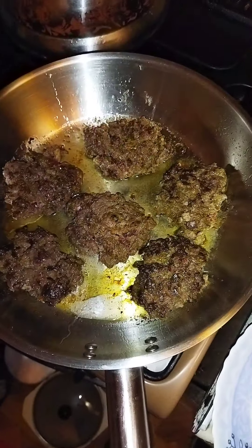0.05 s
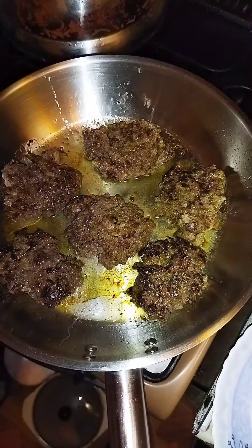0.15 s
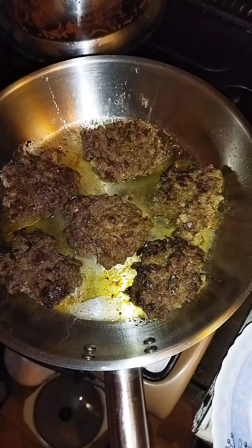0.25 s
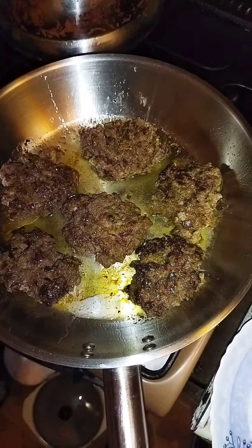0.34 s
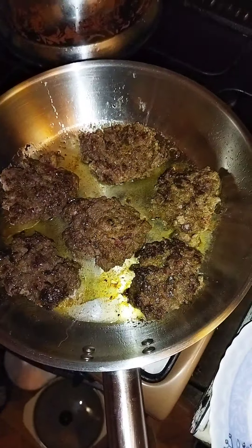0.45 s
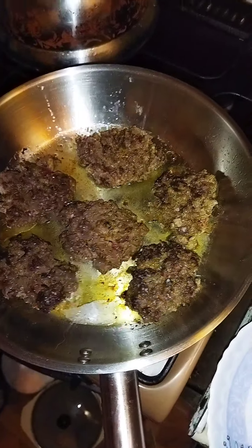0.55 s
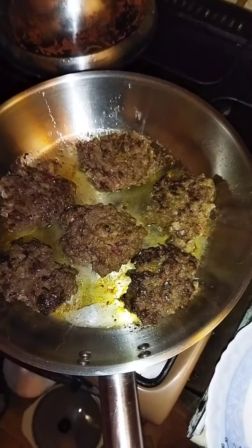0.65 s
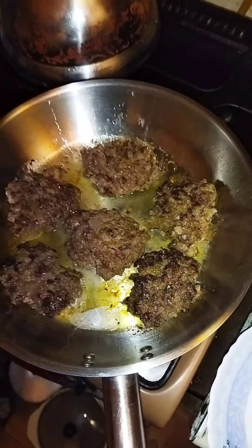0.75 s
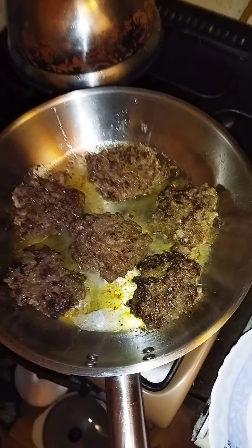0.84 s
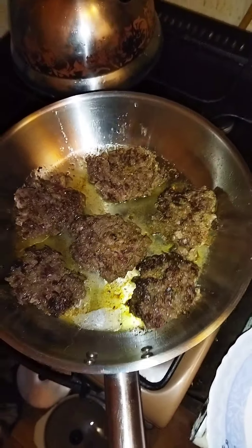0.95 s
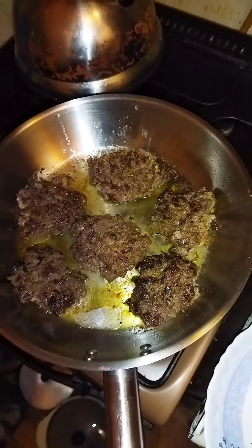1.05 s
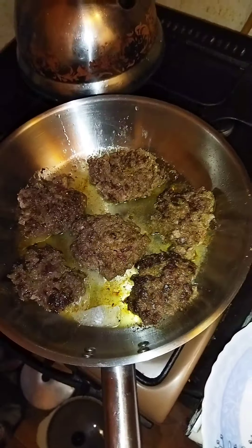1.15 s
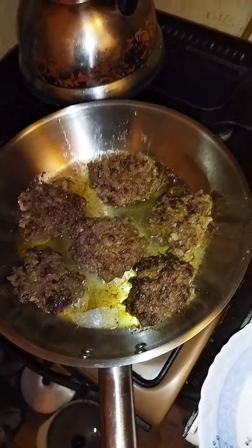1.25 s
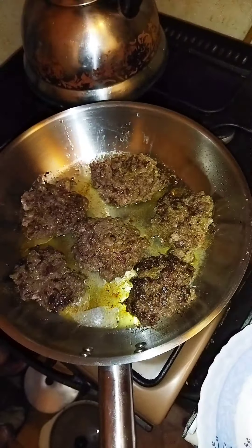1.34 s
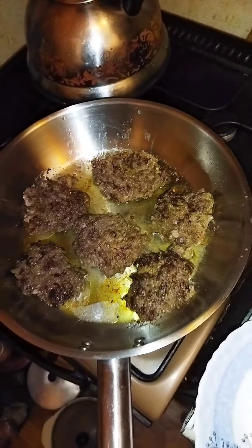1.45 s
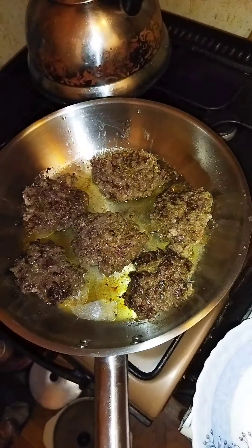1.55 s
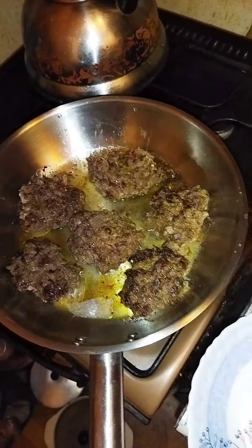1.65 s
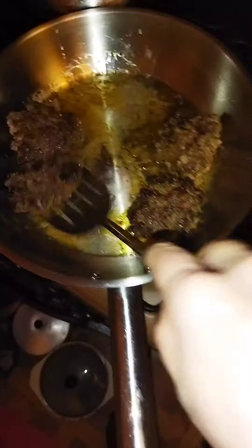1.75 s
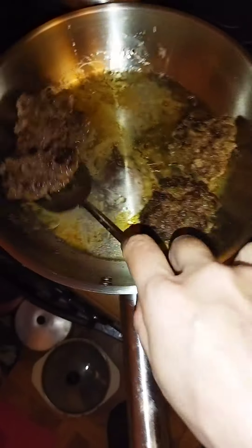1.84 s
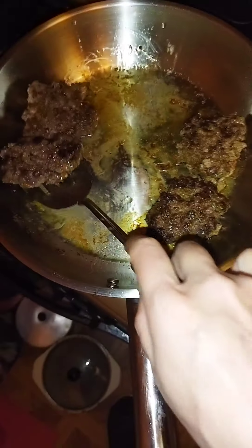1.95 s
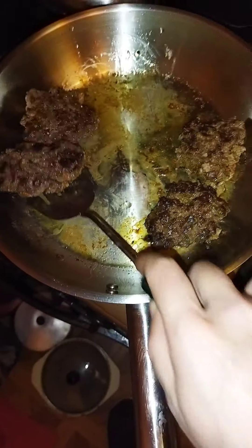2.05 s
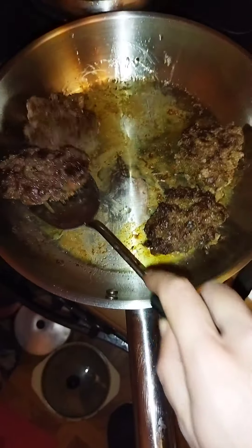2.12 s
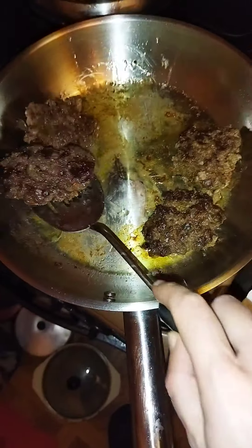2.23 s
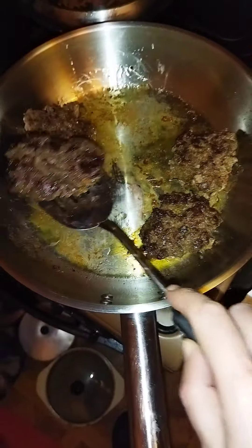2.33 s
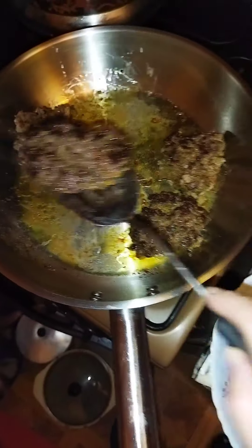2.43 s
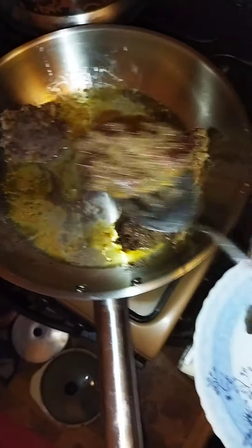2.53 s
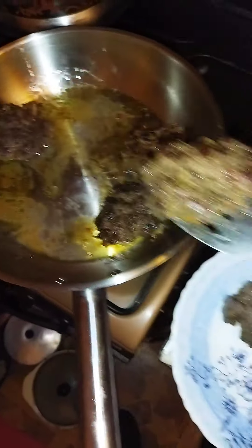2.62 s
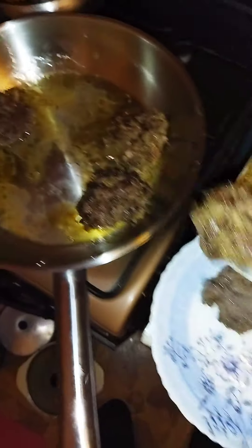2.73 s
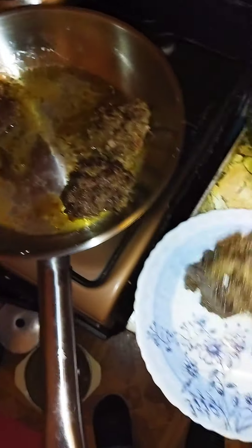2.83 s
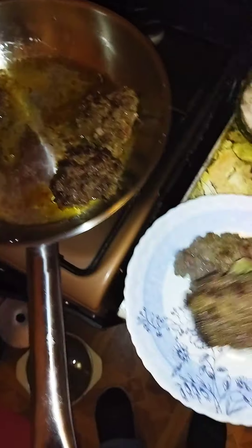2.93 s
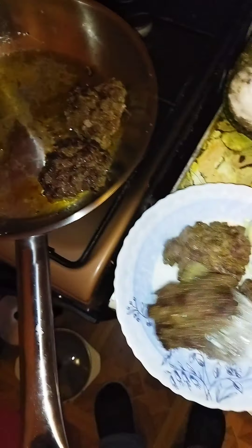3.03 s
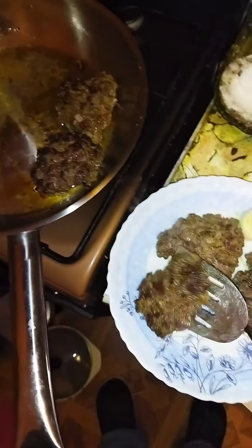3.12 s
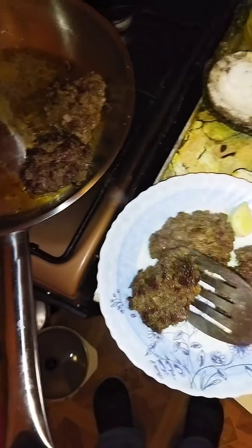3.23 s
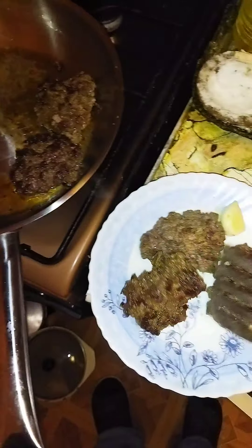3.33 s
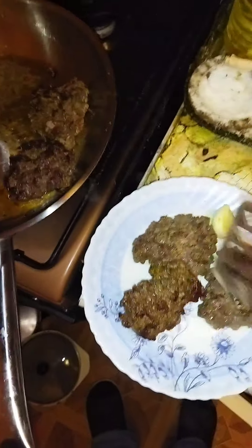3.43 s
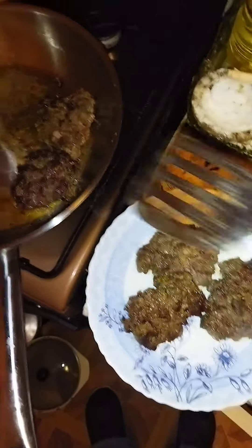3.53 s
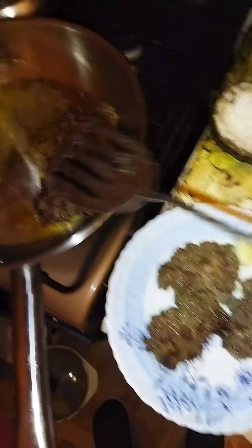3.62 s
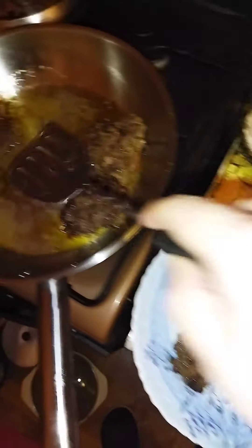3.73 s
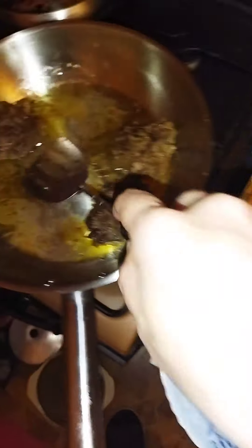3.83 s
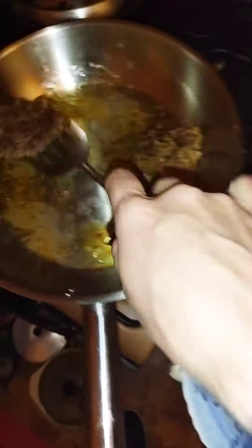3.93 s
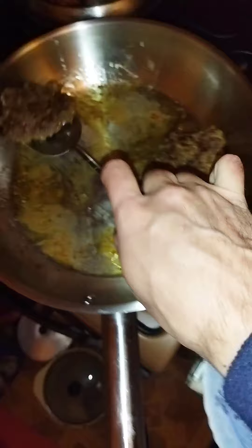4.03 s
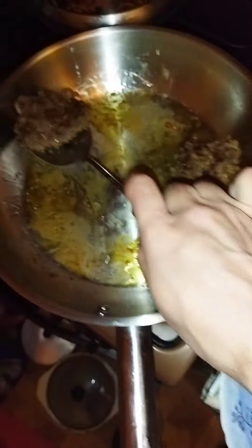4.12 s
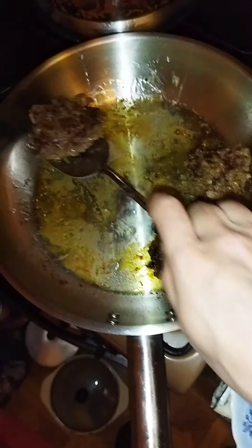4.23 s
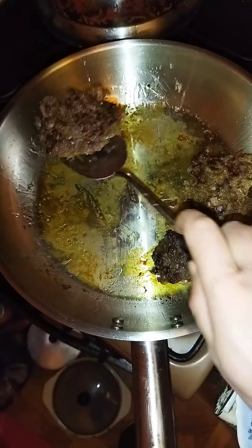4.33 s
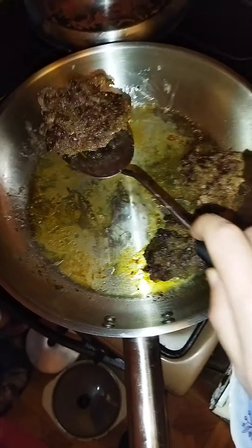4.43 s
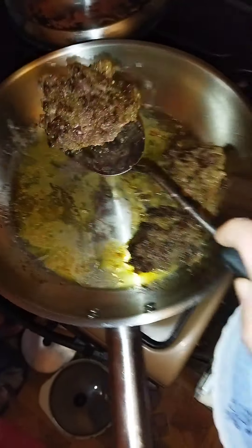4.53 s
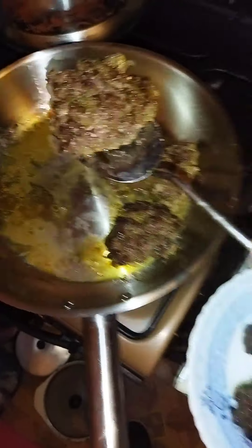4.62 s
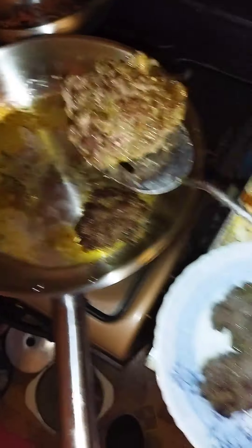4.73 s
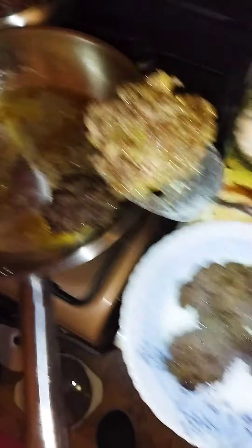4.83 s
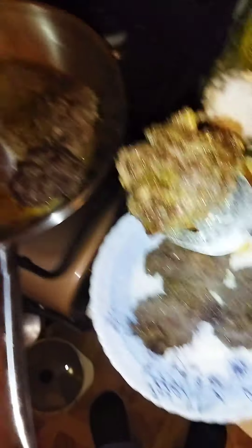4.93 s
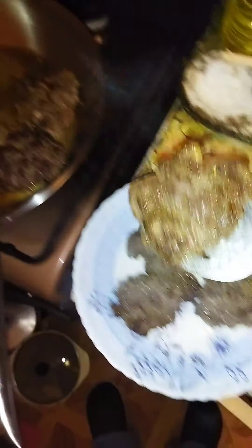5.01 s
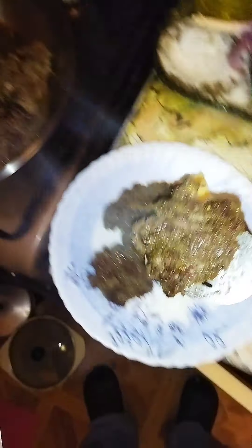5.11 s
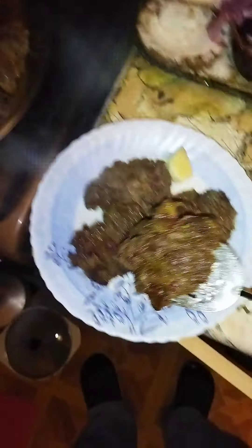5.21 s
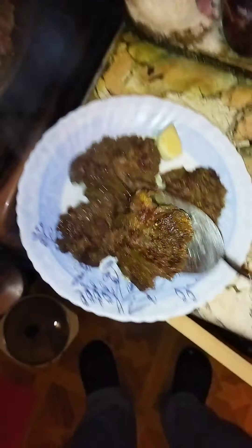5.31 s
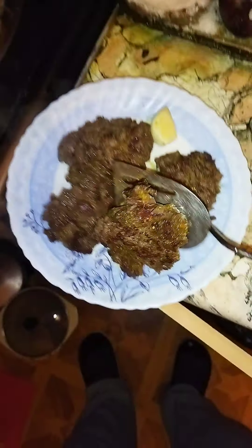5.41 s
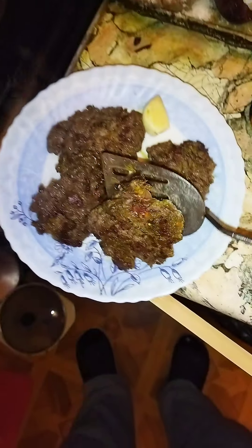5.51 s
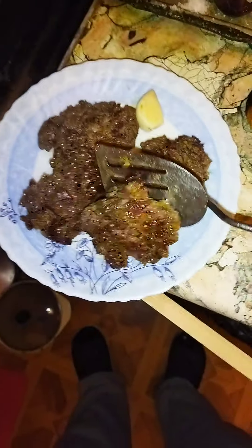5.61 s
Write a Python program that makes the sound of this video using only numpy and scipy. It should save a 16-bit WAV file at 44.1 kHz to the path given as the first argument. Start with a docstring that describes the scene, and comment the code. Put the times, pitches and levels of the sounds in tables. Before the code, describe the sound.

In a quiet kitchen, hot fat spits and ticks in a steel pan. A metal spatula hits the pan hard and scrapes under a patty, which drags dully through oil. The blade clacks brightly on a plate, then a second rougher scrape follows with a soft meaty rustle and a light metallic swish. It ends with faint spits over low hum. Close stereo microphones, short room echo.

```python
"""A quiet kitchen: patties lie in a steel pan of hot oil, and fat spits as bursts of banded noise.
A steel spatula strikes the pan and slides under a patty: rough slips and blows excite the pan's modes.
It clacks on a plate, heard as rattle and dying sines, then scrapes the pan again; dragged meat rustles.
A pair of close microphone ports hears it over filtered hum and hush, with a decaying noise echo."""
import sys
import numpy as np
from scipy import signal
from scipy.fft import rfft, irfft
from scipy.io import wavfile
from scipy.ndimage import uniform_filter1d

SR = 44100
rng = np.random.default_rng(int(sys.argv[2]) if len(sys.argv) > 2 else 0)


def to_wav(sig):
    """Store sig (one row per channel, or 1-D mono) as 16-bit WAV at the path in sys.argv[1].

    Samples outside -1..1 are clipped; the rate is SR.
    """
    pcm = np.clip(np.atleast_2d(sig), -1, 1) * 32767
    pcm = np.round(pcm).astype(np.int16)
    wavfile.write(sys.argv[1], SR, pcm.T)  # frames by channels


N = 249606

TIME = np.arange(N) / SR  # s
BINS = np.fft.rfftfreq(N, 1 / SR)  # Hz


def amp(db):
    """Decibel law: the amplitude gain of a level in dB."""
    return 10 ** (np.asarray(db) / 20)


def evened(x):
    """Power normalization: scales a signal to rms 1."""
    return x / np.sqrt(np.mean(x ** 2) + 1e-20)


def read(points, hz, axis=1):
    """Logarithmic pitch scale: interpolates one column of a table over log frequency."""
    columns = np.transpose(points)
    return np.interp(np.log(hz + 1), np.log(columns[0] + 1), columns[axis])


def add(mix, s, sound):
    """Superposition: adds a sound into the mix at time s."""
    part = mix[..., round(s * SR):][..., :sound.shape[-1]]
    part += sound[..., :part.shape[-1]]


def band(x, lo_hz, hi_hz, order=2):
    """Band limiting: a Butterworth band-pass."""
    edges_hz = [lo_hz, min(hi_hz, .49 * SR)]
    return signal.sosfilt(signal.butter(order, edges_hz, "bandpass", fs=SR, output="sos"), x)


def ports(pair, table):
    """Partial coherence: two unrelated versions become left and right with set likeness and balance."""
    same, balance_db = (read(points, BINS) for points in table)
    same = np.clip(same, -1, 1)
    first, second = rfft(pair)
    right = same * first + np.sqrt(1 - same ** 2) * second
    return irfft(np.array([first * amp(balance_db / 2), right * amp(-balance_db / 2)]), N)


def ring(modes):
    """Modal decay: a sum of exponentially dying sines, each swelling over its first 1.9 cycles."""
    t = TIME[:SR]
    out = 0
    for hz, db, t60 in modes:
        swell = np.minimum(t * hz / 1.9, 1)
        out = out + amp(db - 60 * t / t60) * swell * np.sin(2 * np.pi * hz * t)
    return out


def tilted(x, tilt_db, pivot_hz=4000):
    """Spectral tilt: lowers the part below the pivot and raises the rest by tilt_db, which may move in time."""
    low = signal.sosfilt(signal.butter(1, pivot_hz, fs=SR, output="sos"), x)
    return amp(-tilt_db) * low + amp(tilt_db) * (x - low)


def grit(shape, rough_db, clump_db=-0.5):
    """Stick-slip friction: dense slips of uneven size that come in clumps a few milliseconds long."""
    clumps = evened(uniform_filter1d(rng.standard_normal(shape[1]), 150))
    uneven_db = rough_db * np.minimum(rng.exponential(1, shape), 5)
    return evened(rng.standard_normal(shape) * amp(uneven_db + clump_db * clumps))


# Spectrum of the hum and hush. Each row: frequency in Hz, relative level in dB per Hz.
HUSH_SPECTRUM = [(15, -61), (25, -40), (48, -29.5), (64, -9), (126, -2.5), (371, -8.5), (812, -15.5),
                 (981, -15.5), (1320, -18.5), (1590, -18.5), (2730, -20.5), (4100, -23), (6850, -28.5),
                 (9720, -24.5), (15800, -23.5)]
# Slow treble drift of the hush. Each row: time in s, treble swell in units of 1.2 dB.
HUSH_TREBLE_DRIFT = [(0.0, 3.5), (0.3, 0), (1.5, 4), (2.201, -3), (3.0, -5.5), (3.7, -1.5), (4.8, -5.5),
                     (5.66, -0.5)]
# Stereo field of the hush: two lists. Each row of the first: frequency in Hz, likeness of the ports;
# each row of the second: frequency in Hz, left minus right in dB.
AIR_FIELD = ([(60, 0.51), (180, 0.34), (550, 0.091), (1650, 0.076), (4970, 0.082), (15000, -0.35)],
              [(60, 0.0), (180, 1.0), (550, -0.33), (1650, -1.3), (4970, 0.5), (15000, 1.5)])
AIR_DB, HUSH_TOP_HZ = -61, 16000


def air():
    """Random noise shaped in time and frequency: kitchen hum and hush in patches, with slow treble drift."""
    frames, hz = N // 256 + 5, np.fft.rfftfreq(1024, 1 / SR)
    a, b, c, d, patches = rng.standard_normal((frames, 513, 5)).T
    patches = evened(uniform_filter1d(uniform_filter1d(patches, 12, 0), 10, 1))
    s, drift = np.transpose(HUSH_TREBLE_DRIFT)
    treble_weight = (hz / (hz + 5000))[:, None] ** 2
    swell_db = 1.2 * np.interp(np.arange(frames) * 256 / SR, s, drift) * treble_weight
    level_db = read(HUSH_SPECTRUM, hz)[:, None] + 0.67 * patches + swell_db
    z = np.array([a + 1j * b, c + 1j * d]) * amp(level_db)
    z[:, hz > HUSH_TOP_HZ] = 0
    hush = evened(signal.istft(z, nperseg=1024, noverlap=768)[1][:, :N])
    return amp(AIR_DB) * ports(hush, AIR_FIELD)


# Reverberation of the room. Each row: frequency in Hz, decay t60 in s, relative starting level in dB.
ROOM_DECAY = [(103.56, 0.95, 3), (498, 0.87, 9.5), (2000, 0.27, 3), (3544, 0.12, 0), (6026, 0.51, -10),
              (16000, 0.6, -10)]


def kitchen(x):
    """Statistical reverberation: taps of random sign, each band dying at its own speed."""
    taps = np.zeros((2, SR))
    # one tap at a random place in every 20 samples
    at = np.arange(400, SR - 20, 20) + rng.integers(0, 20, (2, (SR - 401) // 20))
    np.put_along_axis(taps, at, rng.choice([-1., 1.], at.shape), 1)
    hz, t, z = signal.stft(taps, SR, nperseg=256)
    z *= amp(read(ROOM_DECAY, hz, axis=2)[:, None] - 60 * t / read(ROOM_DECAY, hz)[:, None])
    tail = signal.istft(z, SR, nperseg=256)[1]
    return signal.fftconvolve(x, tail / np.linalg.norm(tail[0]), axes=1)[:, :N]


def coloured(x, tone, size=2048):
    """Minimum-phase filtering: passes x through the unit-energy response of a spectrum."""
    log = np.log(amp(read(tone, abs(np.fft.fftfreq(2 * size, 1 / SR)))))
    response = np.fft.ifft(np.exp(np.conj(signal.hilbert(log)))).real[:size]
    return signal.oaconvolve(x, response[None] / np.linalg.norm(response), axes=1)[:, :N]


def resonate(x, hz, width):
    """Forced resonance: one mode, gain 1 at its centre."""
    return signal.lfilter(*signal.iirpeak(hz, hz / max(width, 1), SR), x)


# Patty dragged through the oil.
# Each row: start in s, rise in s, length in s, level in dB, fade over its length in dB.
PATTY_DRAGS = [(2.03, .006, .17, -53.5, -11.5), (4.19, 0.33, .6, -53.5, -17)]
LOADED_HZ, LOADED_WIDTH_HZ, LOADED_DB = 280, 32, 12  # low hum of the pan under the dragged meat


def drag():
    """Damped friction: soft meat on oiled steel gives dull grainy noise and drives a low pan resonance."""
    out = np.zeros((2, N))
    for s, rise, length, db, fade_db in PATTY_DRAGS:
        t = np.arange(0, length, 1 / SR)
        level = amp(db + fade_db * (t / length) ** 2)
        shape = np.minimum(t / rise, 1) * level * np.minimum((length - t) / 0.027, 1)
        dull = evened(band(grit((2, len(t)), 0.98), 210, 2260))
        hum = amp(LOADED_DB) * resonate(dull[0], LOADED_HZ, LOADED_WIDTH_HZ)
        add(out, s, shape * (dull + hum))
    return out


# Blade brushing steel lightly. Each row: start in s, length in s, level in dB.
BLADE_BRUSHES = [(2.11, 0.078, -71), (4.47, 0.15, -51.5), (4.7, .06, -69)]
BRUSH_RISE_S, BRUSH_FALL_S = 0.016, 0.066


def brush():
    """Light dry friction: a blade brushing steel gives a bright broadband swish."""
    out = np.zeros((2, N))
    for s, length, db in BLADE_BRUSHES:
        t = np.arange(0, length, 1 / SR)
        shape = amp(db) * np.clip(np.minimum(t / BRUSH_RISE_S, (length - t) / BRUSH_FALL_S), 0, 1)
        add(out, s, shape * evened(band(grit((2, len(t)), 1.7), 1230, 15400)))
    return out


SPIT_T60_S, SNAP_T60_S = .15, 0.1
SPIT_RISE_S, BURST_T60_S, BURST_DB = 0.00075, 0.013, 5  # the first burst stands above the hiss


def spit(hz, t60, octaves):
    """Impulsive release: a droplet bursts as a short puff of banded noise over a longer dying hiss."""
    puff = rng.standard_normal((2, SR // 4))
    puff[1] = 0.13 * puff[0] + 1.3 * puff[1]
    puff = evened(band(puff, hz / 2 ** octaves, min(hz * 2 ** octaves, 15700), order=3))
    t = TIME[:SR // 4]
    decay = amp(-60 * t / t60) + amp(BURST_DB - 60 * t / BURST_T60_S)
    return 0.25 * puff * np.minimum(t / SPIT_RISE_S, 1) * decay


# Fat spits that stand out. Each row: start in s, relative hiss level in dB, hiss centre in Hz,
# hiss reach to either side in octaves, left minus right in dB, relative snap level in dB, snap centre in Hz.
LOUD_SPITS = [(0.0186, -32.5, 6640, 0.79, 4, -25.5, 2930), (0.03, -35, 12300, 0.25, 1, -40, 2750),
              (0.2074, -45.5, 9800, 0.35, 6, -42, 4740), (0.5035, -41.5, 12500, .28, 2, -75, 3080),
              (0.6646, -44, 11400, .32, 1, -66, 3730), (0.7994, -51.5, 11700, .5, 2, -72, 2850),
              (0.972, -50, 13300, 0.65, 2, -54.5, 4900), (1.007, -52, 11300, .48, 0, -51, 3370),
              (1.0632, -36.5, 11400, 0.8, 4.5, -54, 4930), (1.3463, -40, 10000, 0.54, 1.5, -53, 4600),
              (2.223, -30, 14800, 1.28, 6, -29, 3910), (2.4194, -57.5, 9630, 0.51, 6, -74, 2800),
              (2.7744, -47.5, 10100, 0.32, 2, -49.5, 3750), (2.8566, -53.5, 9460, .3, 7, -68, 2670),
              (3.323, -51.5, 14370, .35, -0.5, -53, 3300), (3.6381, -48, 12030, .33, 5, -71.5, 2515),
              (4.3994, -54.5, 13500, .35, 1, -54.5, 2665), (4.6106, -50, 9240, .2, 8, -74, 2750),
              (4.7202, -53, 9270, 0.3, 6, -64.5, 2770), (4.905, -57.5, 9500, .29, 5, -65.5, 3600),
              (5.017, -59, 12250, .45, 3, -69, 2630), (5.069, -55, 8320, .38, 3.5, -69, 3136),
              (5.2837, -56.5, 8970, .3, 3, -70, 3270), (5.3808, -60, 12300, .39, 8, -57, 3100),
              (5.4194, -54, 10660, 0.29, 5.5, -53, 2500), (5.5373, -55, 12170, 0.5, 10.5, -73.5, 2834),
              (5.612, -49.5, 14430, .24, 9, -77, 3950)]
# Dying sines of small pops and taps; rows starting together are modes of one tap.
# Each row: start in s, starting level in dB before the swell, pitch in Hz, t60 in s.
POP_MODES = [(0.502, -41, 257, 0.041), (1.024, -58, 3480, 0.07), (1.1812, -24.5, 756.4, 0.0049),
             (1.3207, -43.5, 2070, 0.0086), (2.313, -45, 289, 0.11), (2.312, -55, 428, .1),
             (2.312, -54, 670, 0.063), (3.458, -53.5, 1750, 0.042), (3.457, -57, 3120, 0.026),
             (5.386, -50, 2225, 0.01), (5.396, -43.5, 1267, 0.075), (5.414, -45, 1307, 0.052),
             (5.426, -56, 1686, 0.12)]


def fat(count=85):
    """Random point events: a uniform scatter of faint spits, with placed loud ones and pops as dying sines."""
    out = np.zeros((2, N))
    for s, hiss_db, hiss_hz, octaves, balance_db, snap_db, snap_hz in LOUD_SPITS:
        wide = spit(hiss_hz, SPIT_T60_S, np.clip(octaves, .05, 2))
        narrow = spit(hiss_hz, SPIT_T60_S, 0.052)
        snap = spit(snap_hz, SNAP_T60_S, 0.58)
        burst = amp(hiss_db) * (wide + .6 * narrow) + amp(snap_db) * snap
        crack = band(signal.unit_impulse(40), 700, 15000, order=1)
        burst[:, :40] += 1.8 * amp(snap_db) * crack
        add(out, s, amp([[balance_db / 2], [-balance_db / 2]]) * burst)
    for when, size, pitch in rng.random((count, 3)):
        faint = spit(8000 * 1.8 ** pitch, 0.1101, 0.093)
        add(out, when * N / SR, amp(-67.5 + 9.3 * size ** 2) * faint)
    for s, db, hz, t60 in POP_MODES:
        add(out, s, ring([(hz, db, t60)])[None])
    return out


def chatter(t60, tick_db, rise):
    """Repeated contact: a first tick, then dying rattle between blade and surface."""
    t = TIME[:SR // 3]
    out = grit((2, len(t)), 3.7) * amp(-60 * t / t60) * np.minimum(t / rise, 1)
    out[:, 0] = amp(tick_db)
    return out


# Blade on the plate. Each row: start in s, strength in dB, chatter t60 in s,
# first tick in dB relative to the strength, rise in s.
PLATE_CLACKS = [(3.085, -52.5, 0.39, -17.5, .012), (3.1231, -13, 0.069, 3, 0.00056),
                (3.138, -32, 0.22, -4.5, 0.0037)]
# Modes of plate and free blade. Each row: frequency in Hz, level in dB relative to the tick, t60 in s.
PLATE_MODES = [(110, -33.5, 0.2), (231.5, -17.5, 0.1238), (291.9, -15, 0.19), (325, -16, 0.19),
               (587, -23, 0.18), (1120, -41.5, 0.5), (1270, -17.5, 0.073), (1697, -36, 0.43),
               (2504, -35, 0.39), (2630, -19, 0.13), (3305, -37, .4), (3940, -23, 0.0993),
               (4250, -32.5, 0.3), (4594, 2, 0.04), (4880, -8.5, 0.0901), (5420, -26, .12),
               (8560, -11.5, .11), (9300, -22, 0.052), (9600, -11.5, .1)]
# Broad colour of contact with the plate. Each row: frequency in Hz, relative level in dB per Hz.
PLATE_COLOUR = [(260, -49.5), (450, -21.5), (556, -5.5), (1030, -16), (1220, -10.5), (2560, -10),
                (2930, -5.5), (4750, -8.5), (9370, -14), (15700, -12), (16600, -44.5)]
# Stereo field of the plate: two lists. Each row of the first: frequency in Hz, likeness of the ports;
# each row of the second: frequency in Hz, left minus right in dB.
PLATE_FIELD = ([(60, 0.34), (180, 1), (550, 1), (1650, -0.11), (4970, -0.26), (15000, 0.089)], [(60, -5.5),
                (180, 1.5), (550, -5.5), (1650, 4.5), (4970, 2), (15000, 8)])


def plate():
    """Impact excitation: each clack rattles briefly and sets the modes ringing."""
    force, rings = np.zeros((2, 2, N))
    for s, db, t60, tick_db, rise in PLATE_CLACKS:
        add(force, s, amp(db) * chatter(t60, tick_db, rise))
        add(rings, s, amp(db + tick_db) * ring(PLATE_MODES)[None])
    return ports(coloured(force, PLATE_COLOUR) + rings, PLATE_FIELD)


def shifting(x, patchy_db):
    """Time-varying spectrum: a scrape's colour changes in patches as the edge meets new scratches."""
    z = signal.stft(x, nperseg=256)[2]
    patches = rng.standard_normal(z.shape[1:])
    patches = evened(uniform_filter1d(uniform_filter1d(patches, 4, 0), 8, 1))
    return signal.istft(z * amp(patchy_db * patches), nperseg=256)[1][:, :N]


# Blade sliding in the pan, one list a stroke.
# Each row: time in s, relative pressure in dB, spot of contact from 0 (centre) to 1 (wall).
BLADE_SLIDES = [
    [(1.775, -23.5, 0.76), (1.801, -32.5, 0.42), (1.871, -27, .08), (1.9, -32.5, 0.13), (1.936, -40, 0.21),
     (1.992, -39, 0.39), (2.024, -44.5, 0.57), (2.045, -59, .5), (2.07, -77, 0.71)],
    [(3.95, -26, 1), (3.976, -30, 0.56), (4.024, -33, 0.29), (4.05, -36, 0.26)],
    [(4.05, -35, 0.34), (4.062, -24, 0.16), (4.082, -19, .7), (4.12, -23, 0.33), (4.135, -30.5, 0.64),
     (4.198, -47.5, 0.42), (4.24, -85, 0.53)],
]
# What each stroke keeps. Each row: treble tilt in dB at the start, the same at the end,
# ringing of the modes in dB, starting thud of the grate in dB.
STROKE_TRAITS = [(-0.5, -2, -2.5, -42), (-4.5, 2.5, -5, -38.5), (3.5, -3.5, -1.5, -49.5)]
# Blade striking the pan or lifting off it. Each row: start in s, strength in dB, chatter t60 in s,
# treble tilt in dB, spot from 0 (centre) to 1 (wall), first tick in dB relative to the strength.
PAN_CONTACTS = [(1.752, -11.5, 0.088, 4.5, 0.045, 1), (1.7612, -21.5, 0.097, -7.5, 0.11, 1),
                (3.9478, -26.5, 0.22, -0.5, 1, 12.5), (3.9677, -25, 0.14, 0.5, 1, 18),
                (4.061, -26, .1, -4.5, .8, 7), (4.165, -43, 0.037, -5.5, 0.85, 19)]
# Modes of pan and blade together. Each row: frequency in Hz, width in Hz,
# drive in dB at the centre, drive in dB at the wall.
PAN_MODES = [(251.5, 10, 15, 6.5), (338, 33, 3, -5), (432, 6.3, -3, 0.5), (602, 9.3, -6, 12),
             (651.8, 5, 0.5, 23.5), (1140, 5.8, -4, 15), (1240, 39, -5.5, 4.5), (1306, 45, -4.5, 13.5),
             (1392, 24, 16.5, -11), (1390, 9, 0, -3.5), (1925, 51, 6.5, 2.5), (2044, 8.1, 1, 7.5),
             (2313, 51, 6, 9), (2547, 27, 8, 8), (3500, 30, 4.5, 10), (3794, 84, 0, 12),
             (3870, 43, 1, -1.5), (4170, 52, 5.5, 3), (4580, 190, -4, 9.5), (5307, 42, -1.5, 6.5),
             (5950, 100, -3.5, 8), (6197, 150, 9, 3), (8870, 420, -2, 7), (9430, 130, -2, 3.5),
             (9500, 190, -1, 1), (11750, 510, -0.5, -1), (13000, 320, 2, -10)]
# Broad colour of contact at centre and wall. Each row: frequency in Hz, relative level in dB per Hz.
CENTRE_COLOUR = [(120, -39.5), (200, -27.5), (254, -9.5), (1000, -13), (1390, -12), (4310, 1), (5280, -16),
                 (9730, -14), (15600, -15.5), (16600, -39.5)]
WALL_COLOUR = [(120, -47), (200, -26), (596, 3), (1040, -4), (1320, -7.5), (1530, -3.5), (3720, -8.5),
               (6240, -2), (15600, -16), (16600, -28.5)]
# Stereo field of the pan: two lists. Each row of the first: frequency in Hz, likeness of the ports
# (limited to 1); each row of the second: frequency in Hz, left minus right in dB.
PAN_FIELD = ([(60, 0.9), (150, 1.3), (380, 1.1), (950, -0.06), (2380, 0.02), (5980, -0.1), (15000, 0.12)],
              [(60, 1.5), (150, -1.5), (380, -0.5), (950, 6), (2380, -0.5), (5980, 6.5), (15000, 4)])
GRATE_T60_S = .9


def pan(wander_db=5.0):
    """Modal excitation: slips, blows and lift-off drive the steel; the spot sets colour and speaking modes."""
    force, walled, thud = np.zeros((3, 2, N))
    free_db = np.zeros(N)
    for rows, (first_db, last_db, ring_db, thud_db) in zip(BLADE_SLIDES, STROKE_TRAITS):
        s, *columns = np.transpose(rows)
        t = np.arange(s[0] - .002, s[-1] + .002, 1 / SR)
        press_db, spot = (np.interp(t, s, c) for c in columns)
        fade = np.sqrt(np.clip(np.minimum(t - t[0], t[-1] - t) / 0.0054, 0, 1))
        slips = tilted(grit((2, len(t)), 4.4), np.linspace(first_db, last_db, len(t)))
        slips = slips * amp(press_db) * fade
        add(force, t[0], slips)
        add(walled, t[0], slips * np.clip(spot, 0, 1))
        add(free_db, t[0], ring_db * fade ** 2)
        add(thud, t[0], amp(thud_db - 60 * (t - t[0]) / GRATE_T60_S) * fade)
    for s, db, t60, tilt_db, spot, tick_db in PAN_CONTACTS:
        jolt = tilted(chatter(t60, tick_db, 0.0017), tilt_db) * amp(db)
        add(force, s, jolt)
        add(walled, s, jolt * np.clip(spot, 0, 1))
    centred = force - walled
    contact = coloured(centred, CENTRE_COLOUR) + coloured(walled, WALL_COLOUR)
    out = amp(-5.0) * shifting(contact, patchy_db=4.0)
    # the moving blade crosses the nodes of each mode, so its drive wanders
    steps = np.arange(0, N / SR + 1, .022)
    chances = rng.standard_normal((len(PAN_MODES), len(steps)))
    for (hz, width, centre_db, wall_db), chance in zip(PAN_MODES, chances):
        wander = wander_db * np.tanh(np.interp(TIME, steps, chance))
        drive = amp(free_db + wander) * (amp(centre_db) * centred + amp(wall_db) * walled)
        out += resonate(drive, hz, width)
    rumble = evened(band(rng.standard_normal(N), 110, 150, order=3))
    grate = rumble * uniform_filter1d(thud, 600)
    return ports(out, PAN_FIELD) + grate


def scene():
    """Direct and reverberant sound: pan, plate, fat and friction up close, an echo, and the hush behind."""
    steel, china, drops = pan(), plate(), fat()
    echo = kitchen(amp(-26) * steel + amp(-34.5) * china + amp(-19.5) * drops)
    return steel + china + drops + drag() + brush() + echo + air()


EDGE_HZ = 16650


def record(dry):
    """Output limits: deepest bass thinned, peaks clipped at full scale, low-pass at EDGE_HZ."""
    thin = signal.sosfilt(signal.butter(2, 55, "highpass", fs=SR, output="sos"), dry)
    cut = signal.firwin(511, EDGE_HZ, window=("kaiser", 9), fs=SR)[None]
    return signal.oaconvolve(np.clip(thin, -1, 1), cut, "same")


dry = scene()
out = record(dry)
to_wav(out)
```